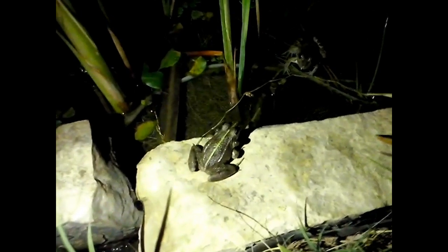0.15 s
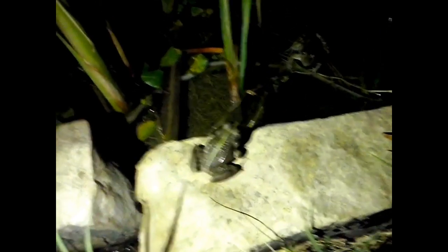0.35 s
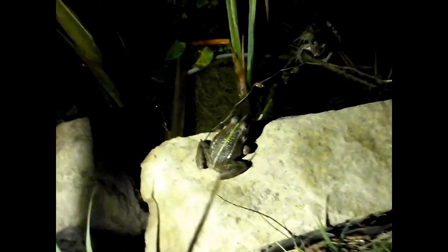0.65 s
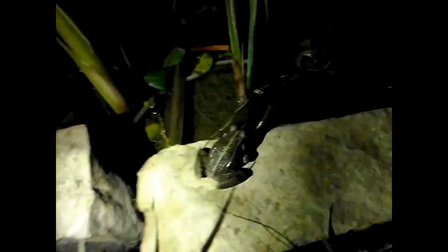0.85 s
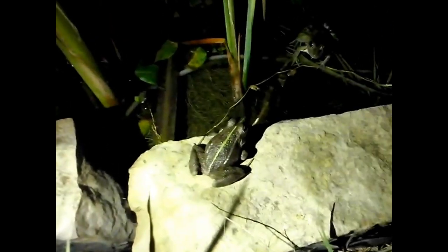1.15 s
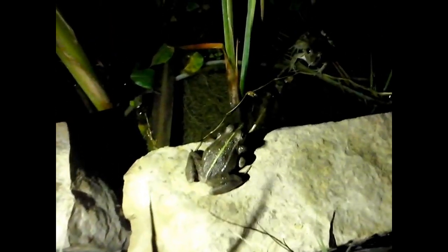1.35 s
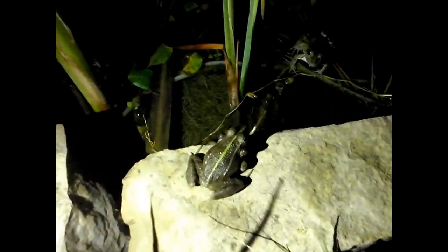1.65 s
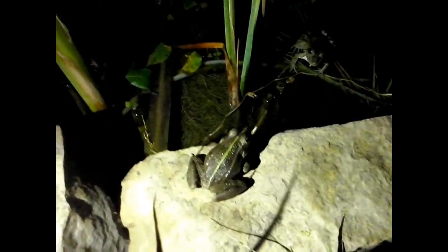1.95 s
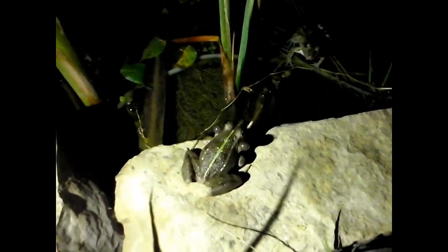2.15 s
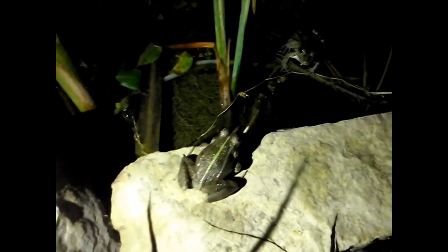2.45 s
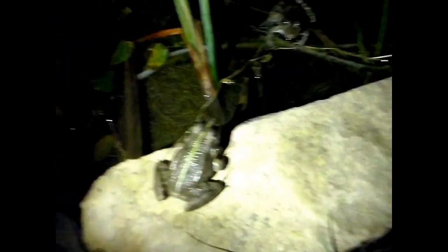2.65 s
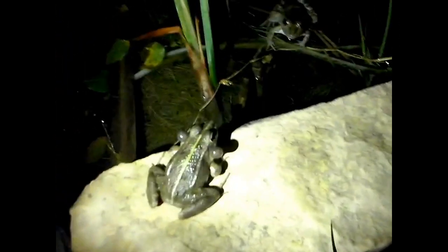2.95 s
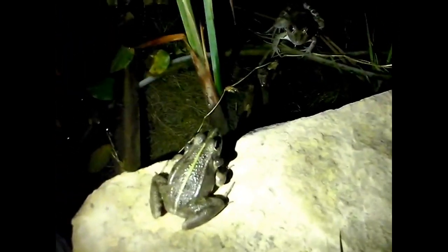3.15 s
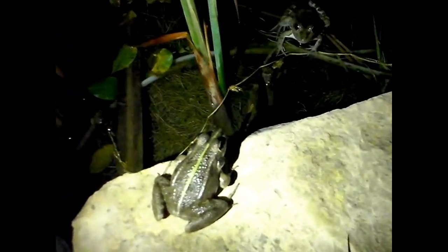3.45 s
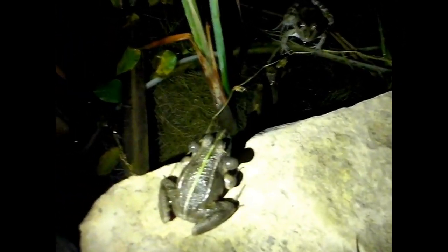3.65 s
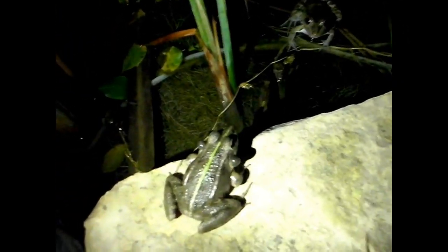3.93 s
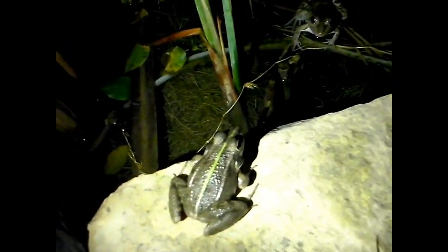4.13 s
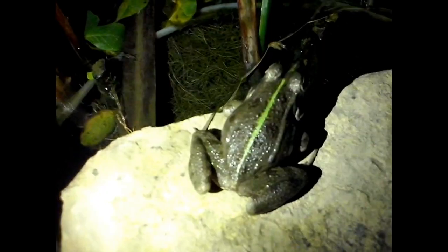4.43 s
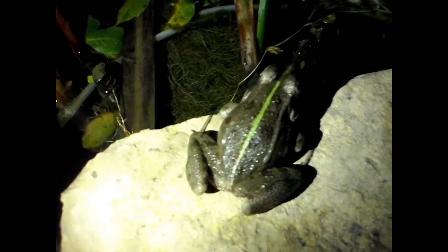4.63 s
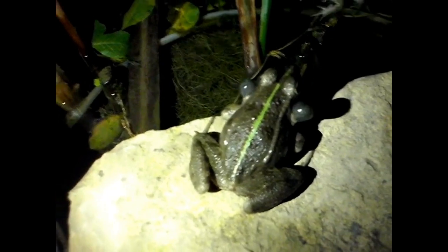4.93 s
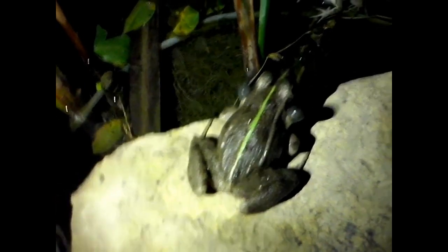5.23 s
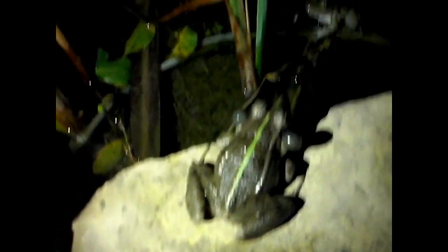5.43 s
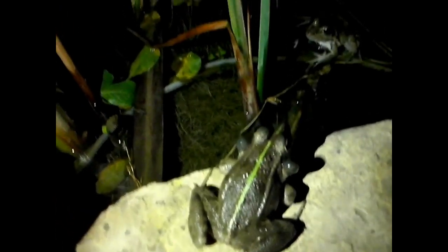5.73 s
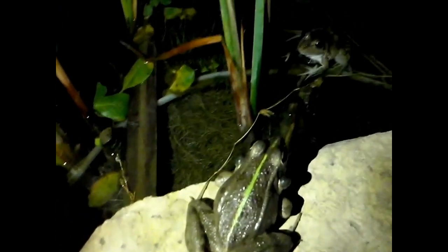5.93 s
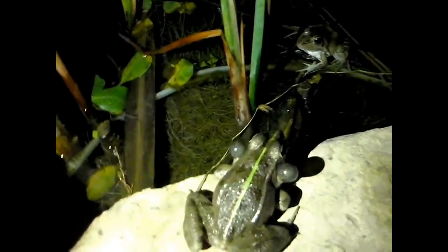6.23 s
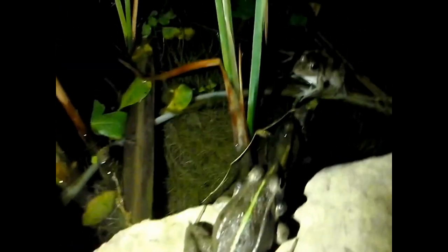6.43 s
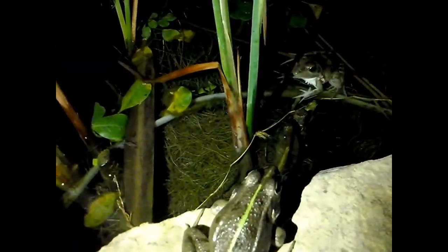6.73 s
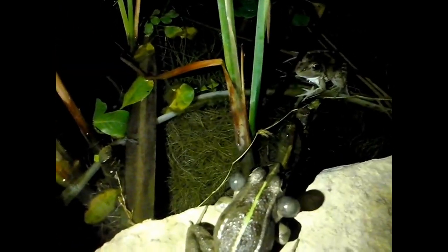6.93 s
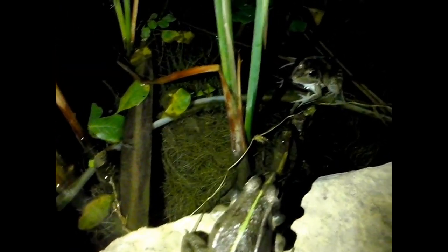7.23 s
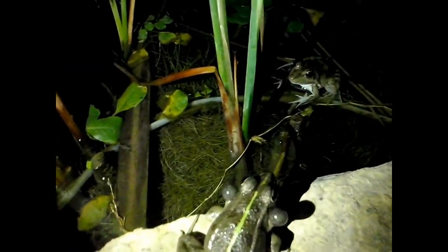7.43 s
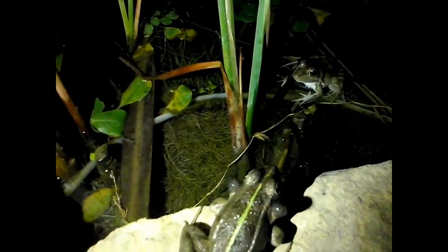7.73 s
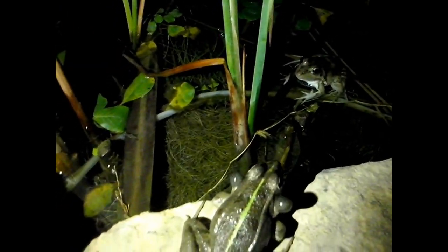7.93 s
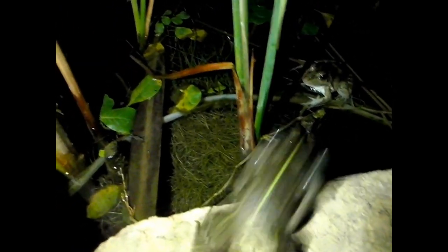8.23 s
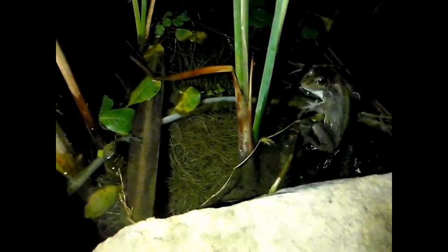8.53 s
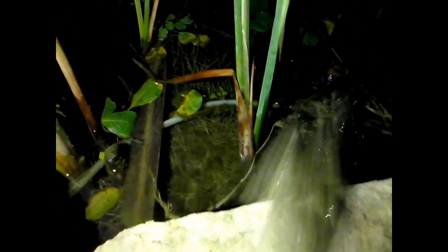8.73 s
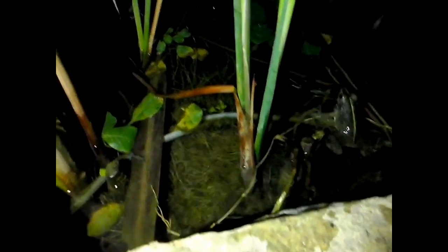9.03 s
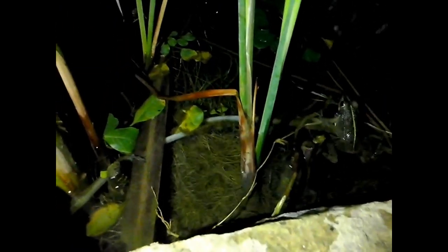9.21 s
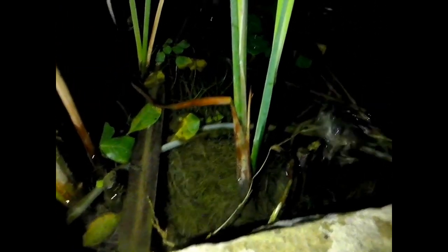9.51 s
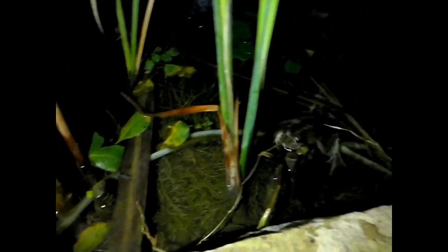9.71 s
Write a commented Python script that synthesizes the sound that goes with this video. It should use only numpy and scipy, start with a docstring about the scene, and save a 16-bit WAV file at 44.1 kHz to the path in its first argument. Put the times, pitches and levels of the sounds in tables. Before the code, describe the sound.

Frogs croak right by the microphone at a garden pond at night, each call a quick rattle that rises and falls in pitch. Short croaks come at the very start and at 0.7 seconds. After a pause they return at about 2.3, 2.9 and 3.6 seconds. From 4.4 seconds they follow roughly every half second, longer, higher and brighter, loud enough to overload the microphone slightly. The last and longest runs from 9.1 to 9.6 seconds. A steady, high cricket trill continues behind them throughout. Distant frogs buzz softly, most clearly around 4 seconds. Tiny wet ticks and high water drips are scattered about, with clearer drips near 1.1, 3.2 and 9.7 seconds and the strongest at 9. Underneath lie a soft hiss of open air, a distant rumble and faint low hums around 6 seconds and near the end.

```python
"""Frogs by a pond at night

Water frogs croak on a stone, so close to a small camera that they overload it. Each croak is a rattle
that starts hurried and rises and falls in pitch; each syllable of it is a few swelling clicks that ring
the throat and the vocal sacs (the balloons at a frog's cheeks). Behind them, mole crickets trill with
their wings, far frogs buzz, and water drips and plops over a distant rumble and a few low hums."""
import sys
import numpy as np
from scipy import signal
from scipy.fft import rfft, irfft, next_fast_len
from scipy.io import wavfile
from scipy.ndimage import map_coordinates

SR = 44100
rng = np.random.default_rng(int(sys.argv[2]) if len(sys.argv) > 2 else 0)


def put_to_file(sound):
    """Save the sound as 16-bit audio at rate SR, in the file named by the first command-line argument."""
    columns = np.atleast_2d(sound).T  # one column per channel
    safe = np.clip(columns, -1, 1)
    whole_steps = np.round(safe * 32767)
    wavfile.write(sys.argv[1], SR, whole_steps.astype(np.int16))


N = 435266

# How the frogs sit towards the microphone. Each row: time in seconds, garden echo in dB,
# tilt of the throat sound in dB per octave (higher is brighter).
FROG_POSE = [(0, -2, -7.5), (3.8, -5, -5), (4.8, -12, 12), (8.2, -10.5, 31.5), (8.6, -11, 2)]


def amp(db):
    """Turn decibels into a factor to multiply by."""
    return 10 ** (np.asarray(db) / 20)


def unit(x):
    """Scale a sound to an average (rms) level of 1."""
    return x / np.sqrt(np.mean(x ** 2) + 1e-20)


def clock(length):
    """The time of each sample over a length in seconds."""
    return np.arange(int(length * SR)) / SR


def along(points, hz):
    """Read between (Hz, value) points, with octaves evenly spaced."""
    point_hz, values = np.transpose(points)
    return np.interp(np.log(hz + 1), np.log(point_hz + 1), values)


def curves(rows):
    """Turn each column after the time into one value per sample."""
    times, *columns = np.transpose(rows)
    return [np.interp(np.arange(N) / SR, times, column) for column in columns]


def wobble(rate):
    """A smooth curve through `rate` random values a second."""
    return map_coordinates(rng.standard_normal(int(N * rate / SR) + 4), [np.arange(N) * rate / SR])


def filtered(x, response):
    """Scale each frequency of a sound by response(hz)."""
    size = next_fast_len(N + SR // 2)
    return irfft(rfft(x, size) * response(np.fft.rfftfreq(size, 1 / SR)), size)[:N]


def noise(spectrum):
    """Noise of level 1, shaped by (Hz, dB) points."""
    return unit(filtered(rng.standard_normal(N), lambda hz: amp(along(spectrum, hz))))


def add(track, start, sound):
    """Mix a sound into a track at a start time in seconds."""
    i = int(round(start * SR))
    part = sound[max(-i, 0):max(N - i, 0)]
    track[max(i, 0):max(i, 0) + len(part)] += part


def ring(t, hz, t60, attack):
    """A tone struck at t = 0; its ring time, t60, is the seconds it takes to fade by 60 dB."""
    t = np.maximum(t, 0)
    return np.sin(2 * np.pi * hz * t) * amp(-60 * t / t60) * (1 - np.exp(-t / attack))


def night(rumble_gain_db=2, air_gain_db=4.5):
    """Distant rumble and the soft hiss of the open air."""
    # Background loudness. Each row: time in seconds, relative levels of rumble and air in dB.
    levels = [(0.0, -32.5, -37), (0.38, -47, -49), (7.72, -43, -45), (7.89, -52, -39.5),
              (8.6, -39.5, -41.5), (9.87, -40, -44)]
    # The tone colour of each noise. Each row: frequency in Hz, relative level in dB.
    rumble_spectrum = [(20, -55), (45, -15), (70, -4.5), (100, 2), (140, -11.5), (190, -4), (260, -16.5),
                       (450, -19), (900, -89)]
    air_spectrum = [(30, -60), (150, -37), (500, -4.5), (690, 0), (755, 13.5), (830, -4), (1100, 7.5),
                    (1500, 1.5), (2000, 5.5), (2900, 0), (4500, -3), (7000, -8)]
    rumble_db, air_db = curves(levels)
    rumble = amp(rumble_db + rumble_gain_db + 2 * wobble(9.2)) * noise(rumble_spectrum)
    air = amp(air_db + air_gain_db + 0.25 * wobble(4.3)) * noise(air_spectrum)
    return rumble + air


def hums(fade_share=0.12, waver=0.019):
    """Low tones swell, waver and fade."""
    # The hums. Each row: start in seconds, length in seconds, pitch in Hz, level in dB.
    tones = [(5.948, 0.68, 110, -41), (8.654, 1.25, 90.9, -40), (9.739, 0.15, 242, -29.5)]
    out, drift = np.zeros(N), wobble(16.1)
    for start, length, hz, db in tones:
        t = clock(length)
        swell = np.clip(np.minimum(t, length - t) / (fade_share * length), 0, 1)
        phase = 2 * np.pi * np.cumsum(hz * (1 + waver * drift[:len(t)])) / SR
        add(out, start, amp(db) * swell * unit(np.sin(phase) + amp(-18.5) * np.sin(2 * phase)))
    return out


def cricket(hz=2345, strokes_per_s=76.6, sag_hz=130, drift_hz=9, uneven_db=1.9, slip_rad=1.42):
    """Each wing stroke makes one swelling tone that sags in pitch and starts out of step with the last."""
    strokes = np.cumsum(strokes_per_s * (1 + .012 * wobble(5))) / SR
    progress = strokes % 1
    slip = slip_rad * rng.standard_normal(1000)[strokes.astype(int)]
    pitch = hz + sag_hz * (.5 - progress) + drift_hz * (wobble(60) + .5 * wobble(4.4))
    swell = np.abs(np.sin(np.pi * progress)) ** 0.99 * amp(uneven_db * wobble(50))
    return unit(swell * np.sin(2 * np.pi * np.cumsum(pitch) / SR + slip))


def crickets(others_db=-14, gain_db=-1):
    """One mole cricket trills over the blurred ring of others farther off."""
    # Loudness of the trill. Each row: time in seconds, relative level in dB.
    levels = [(.13, -17), (.36, -25), (.62, -27.5), (.89, -17), (1.12, -25.5), (1.7, -29), (2.2, -28),
              (2.47, -22), (2.8, -28), (3.15, -19.5), (3.5, -28), (3.88, -20), (4.25, -26), (5.55, -22),
              (6.45, -25.5), (7.9, -25.5), (8.6, -21), (9.87, -23.5)]
    others = noise([(1900, -22.5), (2140, -5), (2210, -30), (2300, -16),
                    (2430, -8.5), (2560, -10.5), (2800, -79)])
    return amp(curves(levels)[0] + gain_db) * unit(cricket() + amp(others_db) * others)


def far_frogs(pulses_per_s=70, t60=0.027, gain_db=16, chorus_db=-44, chorus_hz=1350, count=34):
    """Distant croaks blur into soft, rough buzzes: a few clear ones and a chorus behind them."""
    # Croaks across the pond. Each row: start and length in seconds, pitch in Hz, relative level in dB.
    clear_croaks = [(1.72, 0.038, 910, -42), (3.917, .14, 1750, -38), (3.923, 0.13, 824, -39.5),
                    (4.077, 0.19, 1650, -44), (4.168, 0.11, 3320, -40), (5.46, 0.18, 1490, -44)]
    chorus = [(when * N / SR, 0.089 + 0.083 * span, chorus_hz * 2 ** (pitch - .5), chorus_db - 9 * far)
              for when, span, pitch, far in rng.random((count, 4))]
    out, t = np.zeros(N), clock(.03)
    for start, length, hz, db in list(clear_croaks) + chorus:
        ages = np.arange(0, length, 1 / pulses_per_s)
        for age, (late, detune) in zip(ages, rng.standard_normal((40, 2))):
            swell = amp(db + gain_db) * np.sin(np.pi * age / length)
            pulse = ring(t, hz * (1 + .04 * detune), t60, attack=0.00042)
            add(out, start + age + 0.013 * late, swell * pulse)
    return out


def crackle(level_db=-33, spread_db=12, band_hz=(3000, 7000), t60=0.027, count=170):
    """Tiny wet ticks from the weed and the water's edge."""
    out, t = np.zeros(N), clock(.02)
    for when, faintness in rng.random((count, 2)):
        fade = amp(level_db - spread_db * faintness - 60 * t / t60)
        add(out, when * N / SR, fade * rng.standard_normal(len(t)))
    return signal.sosfilt(signal.butter(1, band_hz, "band", fs=SR, output="sos"), out)


def drips(t60=0.033, splash_db=-6, gain_db=4, faint_db=-34, count=36):
    """Each drip rings a bubble that rises in pitch under a brief splash; fainter ones fall at random."""
    # The clear drips. Each row: start in seconds, relative level in dB, pitch in Hz the bubble rises past.
    drops = [(1.069, -25, 4970), (1.094, -26, 4940), (1.524, -36, 6400), (1.743, -36, 6070),
             (2.624, -29, 2910), (3.216, -20, 4836), (3.35, -29.5, 5130), (4.045, -32.5, 5700),
             (5.936, -25.5, 3980), (6.235, -27, 6300), (8.988, -12.5, 3260), (9.729, -20, 4300)]
    faint = [(when * N / SR, faint_db - 9 * faintness, 4000 + 2500 * pitch)
             for when, faintness, pitch in rng.random((count, 3))]
    out, t = np.zeros(N), clock(.06)
    for start, db, hz in list(drops) + faint:
        cycles = np.cumsum(hz * (1.15 - .4 * np.exp(-t / .003))) / SR
        bubble = np.sin(2 * np.pi * cycles) * amp(-60 * t / t60) * (1 - np.exp(-t / 0.0029))
        band = signal.butter(1, [.7 * hz, 1.3 * hz], "band", fs=SR, output="sos")
        spray = unit(signal.sosfilt(band, rng.standard_normal(len(t))))
        splash = amp(splash_db - 60 * t / 0.018) * spray
        add(out, start, amp(db + gain_db) * (bubble + splash))
    return out


def syllables(settle_syllables=4, attack_db_per_s=715, release_s=0.0096, push_db=3, push_s=0.095):
    """Time the rattles: each starts hurried and settles, while the sacs tighten and slacken in one arch."""
    # The near croaks. Each row: start and length in seconds, number of syllables, hurry from 0 to 1,
    # sac pitch in Hz at the start, top and end, place of the top from 0 to 1, flatness of the arch
    # (1 is pointed, 4 is flat), relative levels of sac and throat in dB, level change at each end in dB.
    croaks = [(0.01, 0.11, 5, 0.066, 2570, 2500, 2040, 0.34, 1.5, -19, -16.5, -3, -9.5),
              (0.671, .195, 8, .18, 2150, 2710, 2180, 0.38, 1.7, -17.5, -19.5, -34, -26),
              (2.259, 0.17, 7, 0.16, 1850, 2430, 2080, 0.55, 2.7, -17.5, -18, -41.5, -4),
              (2.9, 0.19, 8, 0.23, 2120, 2860, 2140, 0.59, 2, -11.5, -16, -28.5, -8),
              (3.584, 0.25, 10, 0.25, 1920, 2945, 2030, 0.6, 2.6, -13.5, -16, -44.5, -10),
              (4.365, 0.05, 3, 0.053, 1980, 2650, 2520, .95, 0.7, -10, -13.5, -38.5, -2),
              (4.59, 0.32, 13, 0.3, 2030, 3343, 2600, 0.61, 2.42, -10.5, -19, -34.5, -17.5),
              (5.047, 0.29, 12, 0.34, 2050, 3360, 2890, 0.61, 4.7, -10, -21, -34.5, -3),
              (5.646, 0.25, 10, 0.3, 2750, 3230, 2600, 0.72, 3.2, -12, -18, -15, -10),
              (6.47, .304, 12, 0.24, 2470, 3386, 2960, 0.74, 3.65, -9.5, -15.5, -24, 3),
              (7.032, .378, 14, 0.12, 2750, 3510, 2860, 0.79, 2, -15.5, -22, -11, 2.5),
              (7.664, .378, 14, .17, 2860, 3540, 3450, 0.93, 1.66, -14, -21, -11.5, 1),
              (8.072, 0.27, 10, 0.013, 3096, 3246, 2795, 0.84, 0.88, -14.5, -22, -3, 8.5),
              (8.52, 0.33, 12, 0.31, 2170, 2990, 2330, 0.64, 1.7, -11, -27.5, -29.5, -3.5),
              (9.121, .44, 16, .2, 2440, 3550, 1890, 0.65, 0.98, -11.5, -28, -38.5, -1.5)]
    rows = []
    for (start, length, count, hurry, first_hz, top_hz, last_hz, top_place, flatness,
         sac_db, throat_db, first_db, last_db) in croaks:
        gaps = 1 - hurry * np.exp(-np.arange(count - 1) / settle_syllables)
        progress = np.append(0, np.cumsum(gaps)) / gaps.sum()
        age = length * progress
        slack = np.abs(np.interp(progress, [0, top_place, 1], [-1, 0, 1])) ** flatness
        hz = top_hz + slack * (np.where(progress < top_place, first_hz, last_hz) - top_hz)
        swell_db = np.minimum(first_db + attack_db_per_s * age, 0)
        shape_db = swell_db + last_db * np.exp((age - length) / release_s)
        # Full lungs drive the sacs harder at first.
        sac_levels = sac_db + shape_db + push_db * np.exp(-age / push_s)
        # Slack sacs leave more of the sound to the throat.
        throat_levels = throat_db + 0.54 * shape_db + 7.5 * (top_hz - hz) / 1000
        rows.extend(zip(start + age, hz, sac_levels, throat_levels))
    return rows


def frogs(sac_gain_db=6, throat_gain_db=3, taut_hz=3300, jitter_s=.0005, scatter_db=2,
          sac_attack_s=0.00028, throat_attack_s=0.001):
    """Swelling clicks ring the throat and sacs; tight sacs ring higher and make the swell steeper."""
    # The clicks of one syllable. Each row: seconds from its centre, relative level in dB.
    clicks = [(-.0112, -24), (-.0074, -11.5), (-.0032, -4.5), (.003, -3.5)]
    # The sacs' tones. Each row: multiple of the pitch, relative level in dB, ring time in seconds.
    sac_tones = [(1, 1, 0.0063), (.84, 0.5, 0.0038), (1.15, -32.5, 0.012), (1.5, -38, 0.02)]
    # The tones of throat and body. Each row: pitch in Hz, relative level in dB, ring time in seconds.
    throat_tones = [(1076, 6.5, 0.021), (1206, 0, 0.053), (1516, 7, 0.013), (1850, 24, 0.0057),
                    (2314, 11.5, 0.0066)]
    # A thin, high ring. Each row: time in seconds, pitch in Hz, level in dB compared with the sacs.
    upper_ring = [(3.1, 6500, -23.5), (3.7, 6730, -16), (5.2, 6534, -14.5), (8.25, 6550, -11.5),
                  (8.3, 5100, -9), (8.36, 4560, -1), (8.6, 5470, -9.5), (9.4, 6340, -16)]
    out, t = np.zeros(N), clock(.05) - .02
    click_s, click_db = np.transpose(clicks)
    upper_hz, upper_db = curves(upper_ring)
    tilt_db = curves(FROG_POSE)[1]
    rattle = syllables()
    chance = rng.standard_normal((len(rattle), 6, len(clicks), 1))
    for (centre, hz, sac_db, throat_db), (late, size, pitch, shape, pace, strain) in zip(rattle, chance):
        now = int(centre * SR)
        age = t - click_s[:, None] * (1 + 0.1 * pace[0]) - jitter_s * late  # one row per click
        force = amp(click_db[:, None] * (hz / taut_hz) ** 0.71 + scatter_db * size)
        tension = 1 + .028 * pitch + .01 * strain[0]
        opening = 1 + .02 * shape
        sac = sum(amp(db) * ring(age, multiple * hz * tension, t60, sac_attack_s)
                  for multiple, db, t60 in sac_tones)
        upper = ring(age, upper_hz[now] * opening, 0.007, sac_attack_s)
        below_upper = amp(-7) * ring(age, 0.781 * upper_hz[now] * tension, 0.011, sac_attack_s)
        sac += amp(upper_db[now]) * (upper + below_upper)
        throat = sum(amp(db + tilt_db[now] * np.log2(f)) * ring(age, f * opening, t60, throat_attack_s)
                     for f, db, t60 in throat_tones)
        sac_voice = amp(sac_db + sac_gain_db) * unit((force * sac).sum(0))
        throat_voice = amp(throat_db + throat_gain_db) * unit((force * throat).sum(0))
        add(out, centre + t[0], (sac_voice + throat_voice) / np.sqrt(2))
    # So small a body gives off almost no bass.
    return signal.sosfilt(signal.butter(8, 990, "high", fs=SR, output="sos"), out)


def garden_echo(x, delay_s=0.002014):
    """Stones, water and reeds scatter a short echo."""
    # How long the echo lasts. Each row: frequency in Hz, seconds to fade by 60 dB.
    ring_times = [(200, 0.039), (1500, 0.037), (3000, 0.063), (8000, 0.046)]
    hz, t, bands = signal.stft(rng.standard_normal(SR // 4), SR, nperseg=256)
    fade = amp(-60 * t / along(ring_times, hz)[:, None])
    tail = signal.istft(bands * fade, SR, nperseg=256)[1]
    delayed_tail = np.pad(tail / np.linalg.norm(tail), (int(delay_s * SR), 0))
    return signal.fftconvolve(x, delayed_tail)[:N]


def scene():
    """The near frogs and water with their echo, over the sounds of the night."""
    near = frogs() + drips() + crackle()
    echo = amp(curves(FROG_POSE)[0]) * garden_echo(near)
    return (near + echo + far_frogs() + crickets() + hums() + night())[None]


def gain_control(x, threshold_db=-12, slope=0.22, recover_s=0.065):
    """The camera turns down while the sound is loud and recovers shortly after."""
    memory = np.exp(-1 / (recover_s * SR))
    power = signal.lfilter([1 - memory], [1, -memory], x ** 2)
    return x / (1 + power / amp(threshold_db) ** 2) ** slope


def record(dry, sample_hz=16000, band_hz=7450, top_hz=15720, lopsided=0.12, clip_level=1.06):
    """The camera adjusts its volume, samples the sound slowly and flattens the loudest peaks."""
    def passband(hz):
        """Cut the top treble and make up for the dulling of the straight lines below."""
        return 1 / (1 + (hz / band_hz) ** 50) / np.sinc(np.minimum(hz / sample_hz, .5)) ** 2

    band = filtered(gain_control(dry[0]), passband)
    ticks = np.arange(0, N, SR / sample_hz)
    samples = map_coordinates(band, [ticks])
    # The overloaded microphone gives way more in one direction than the other.
    samples += lopsided * np.tanh(samples) ** 2
    clipped = samples / (1 + np.abs(samples / clip_level) ** 14) ** (1 / 14)
    # Joining the samples with straight lines mirrors the sound into the treble.
    joined = np.interp(np.arange(N), ticks, clipped)
    return filtered(joined, lambda hz: (hz < top_hz) * hz / np.hypot(hz, 10))[None]


dry = scene()
out = record(dry)
put_to_file(out)
```